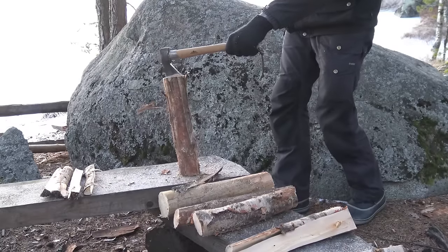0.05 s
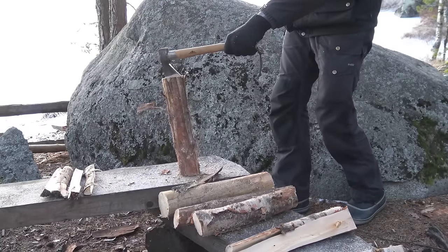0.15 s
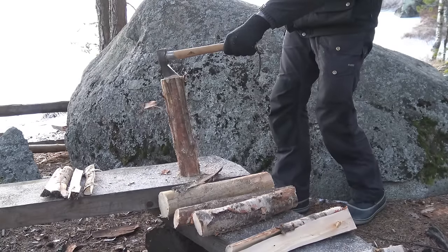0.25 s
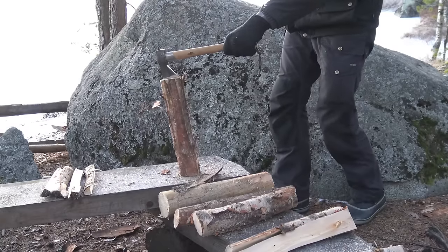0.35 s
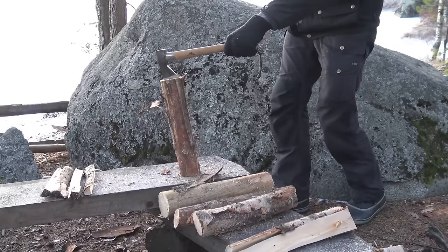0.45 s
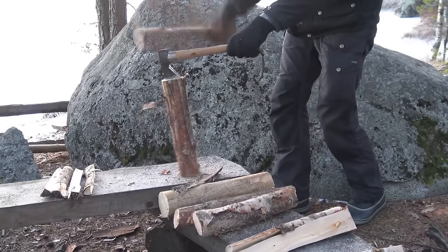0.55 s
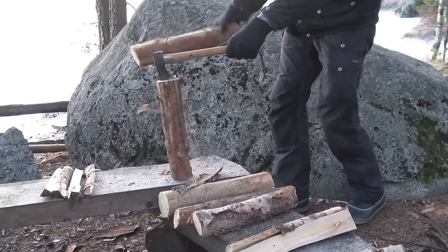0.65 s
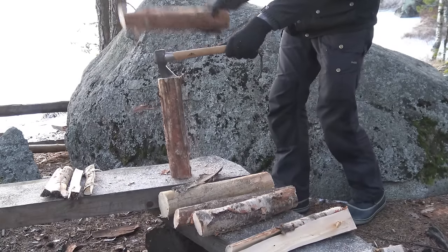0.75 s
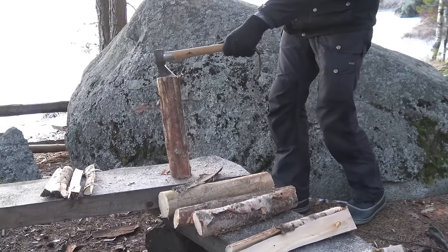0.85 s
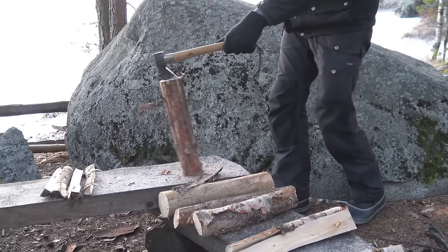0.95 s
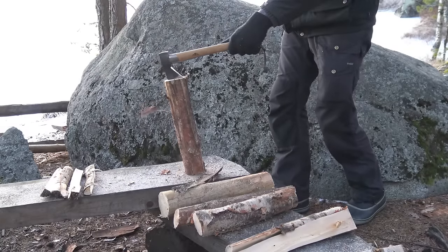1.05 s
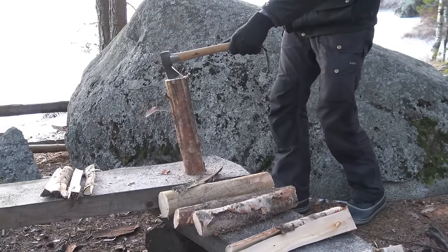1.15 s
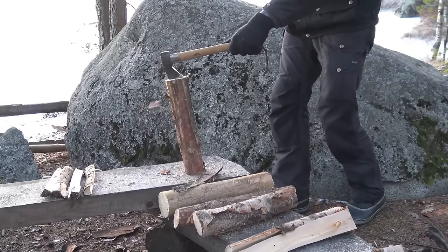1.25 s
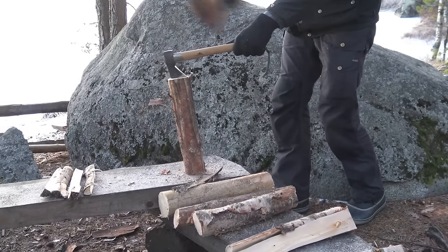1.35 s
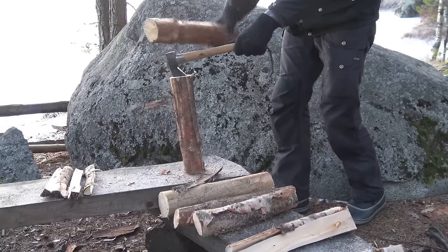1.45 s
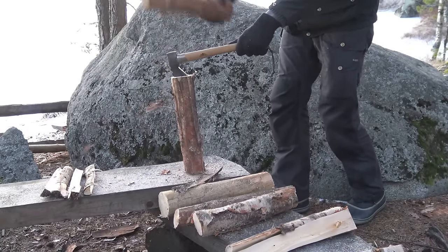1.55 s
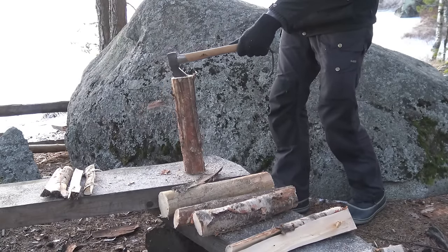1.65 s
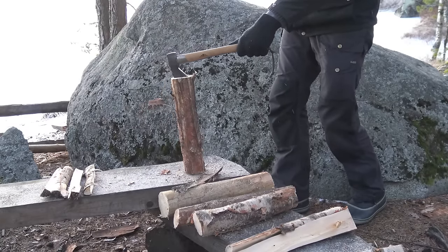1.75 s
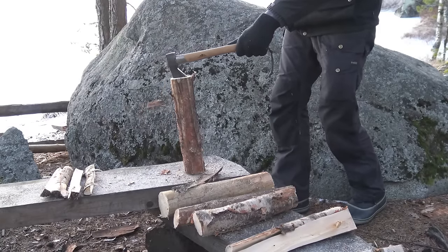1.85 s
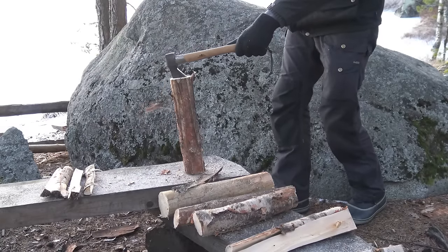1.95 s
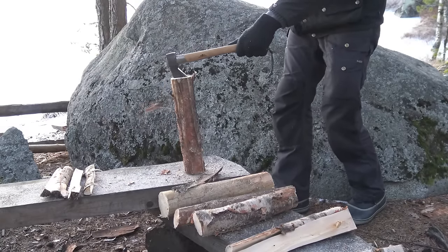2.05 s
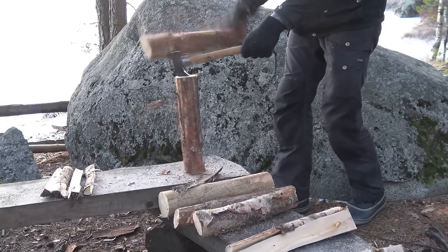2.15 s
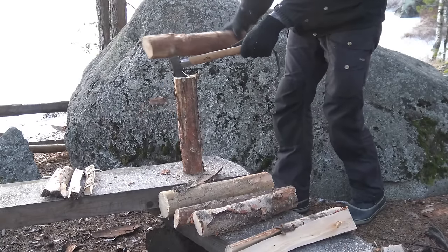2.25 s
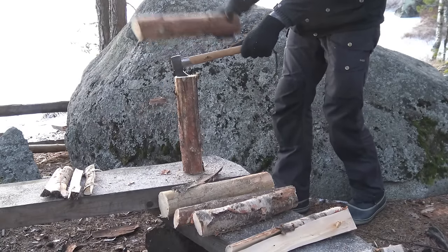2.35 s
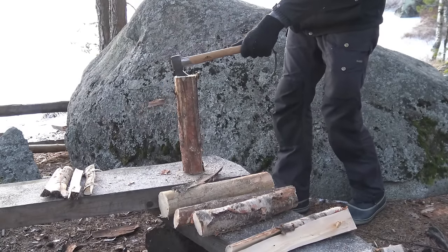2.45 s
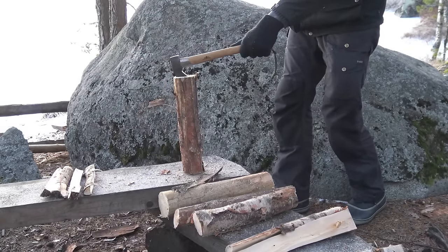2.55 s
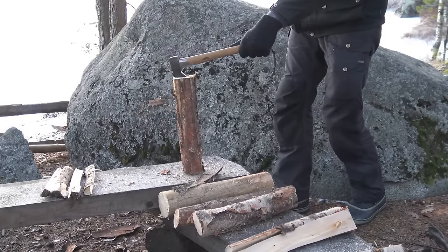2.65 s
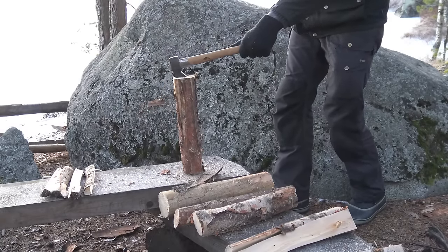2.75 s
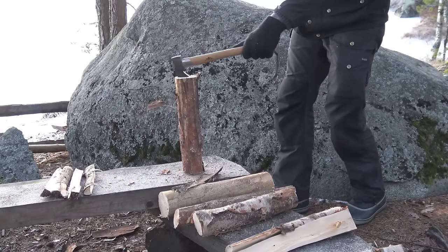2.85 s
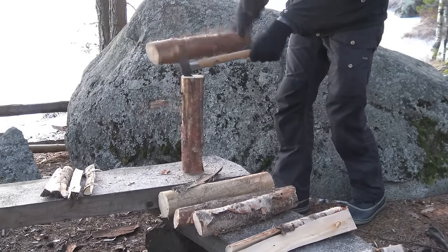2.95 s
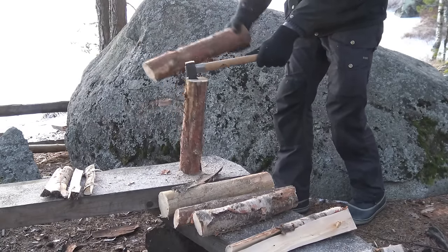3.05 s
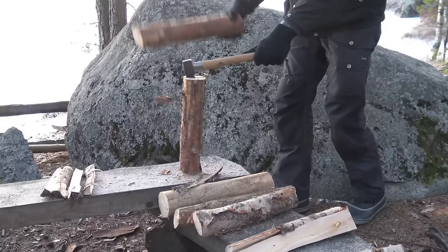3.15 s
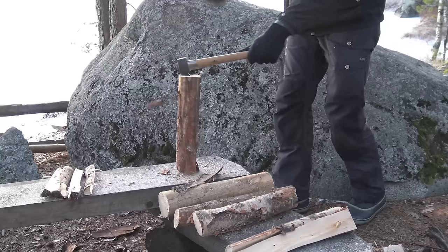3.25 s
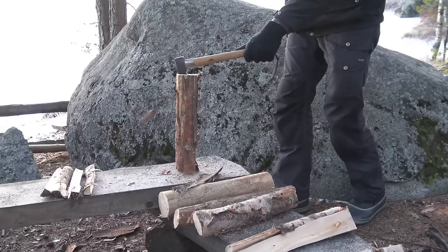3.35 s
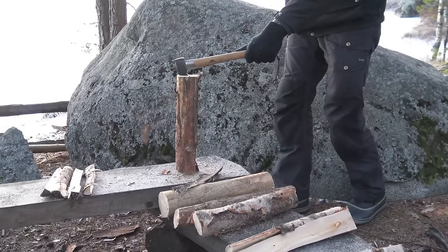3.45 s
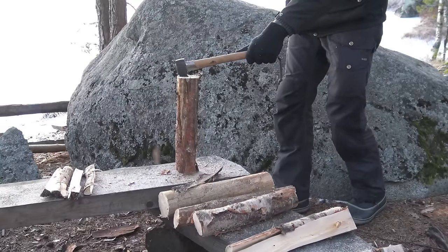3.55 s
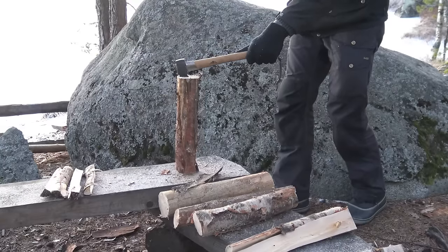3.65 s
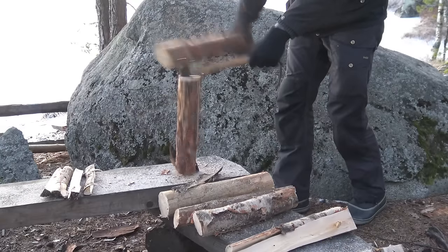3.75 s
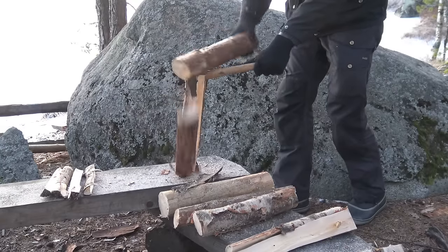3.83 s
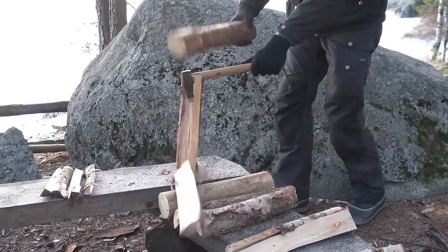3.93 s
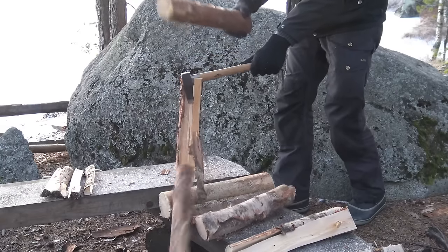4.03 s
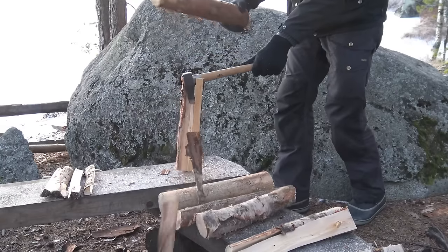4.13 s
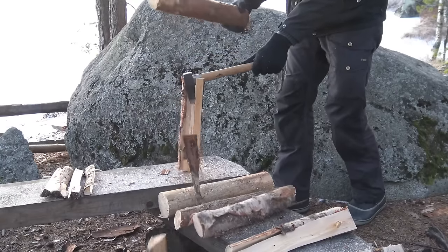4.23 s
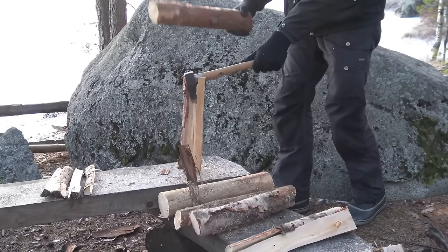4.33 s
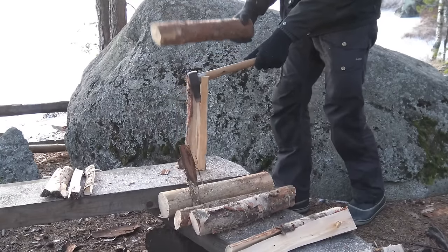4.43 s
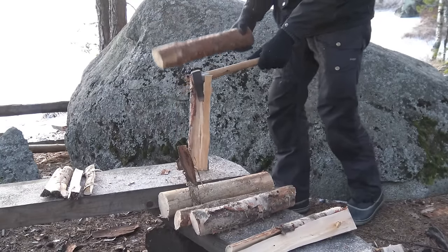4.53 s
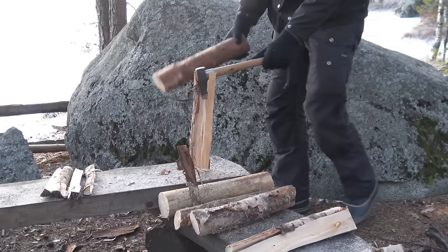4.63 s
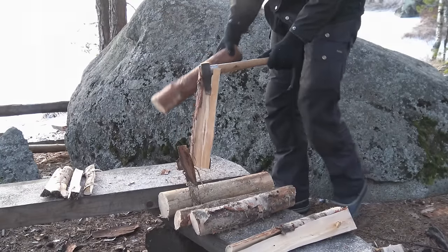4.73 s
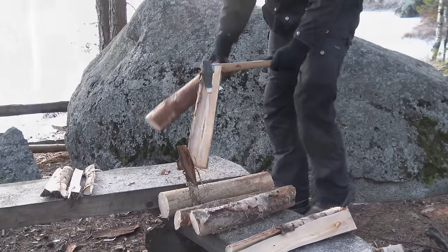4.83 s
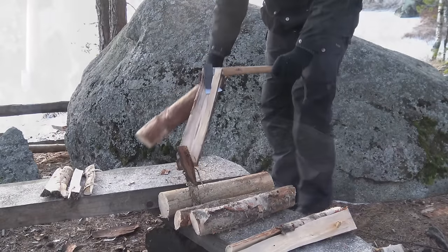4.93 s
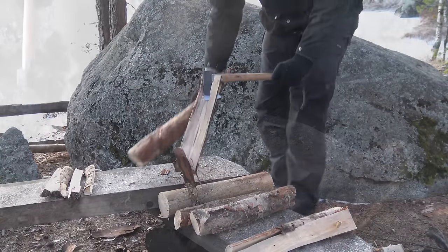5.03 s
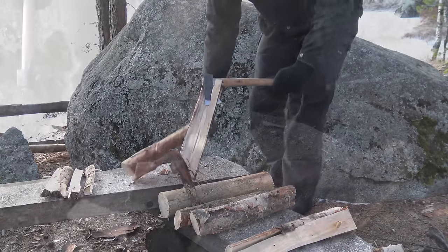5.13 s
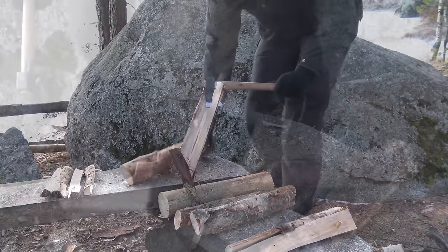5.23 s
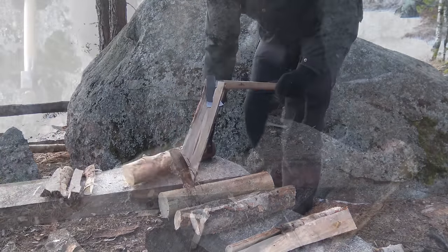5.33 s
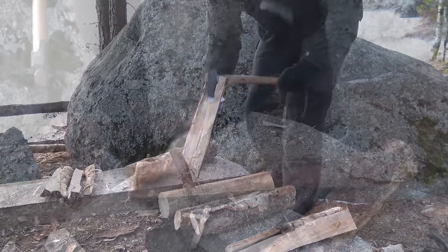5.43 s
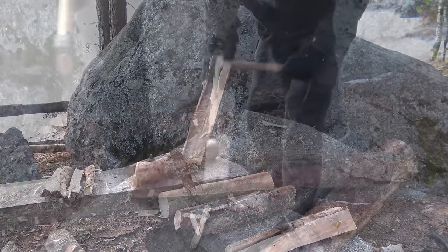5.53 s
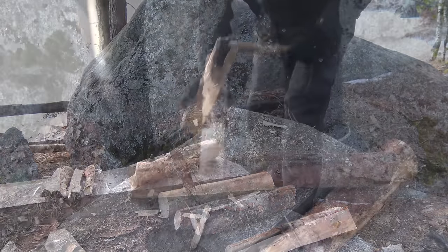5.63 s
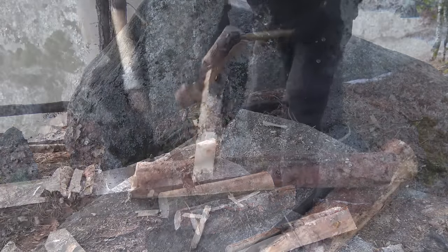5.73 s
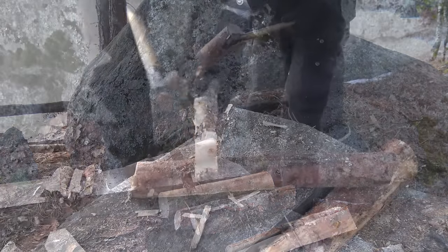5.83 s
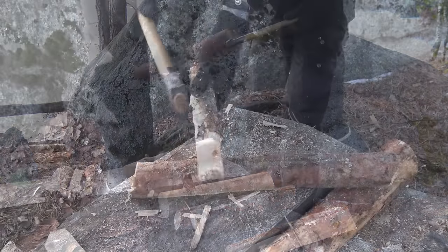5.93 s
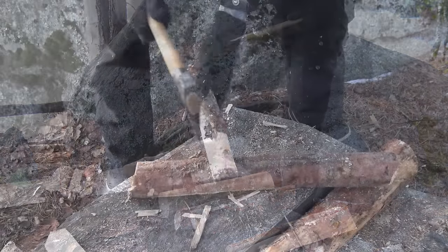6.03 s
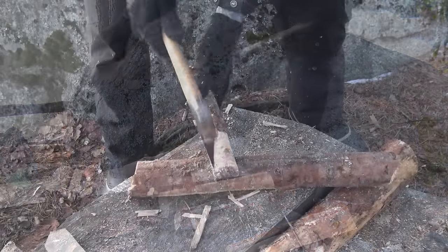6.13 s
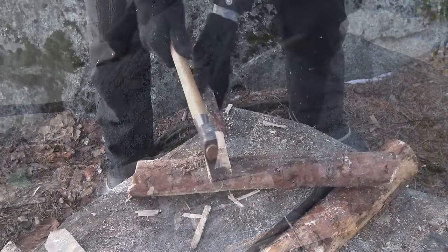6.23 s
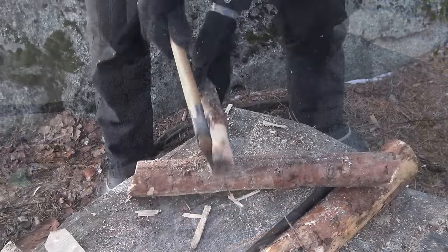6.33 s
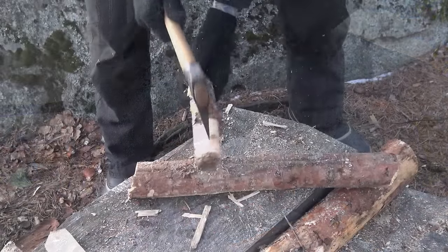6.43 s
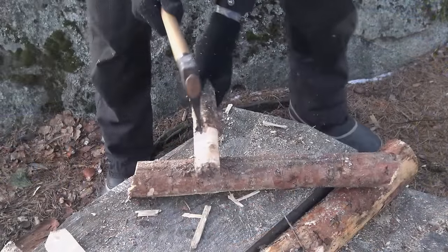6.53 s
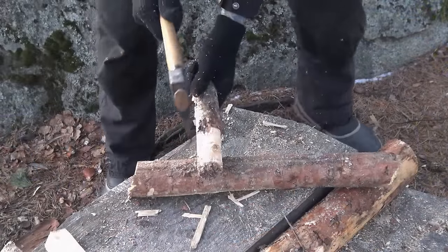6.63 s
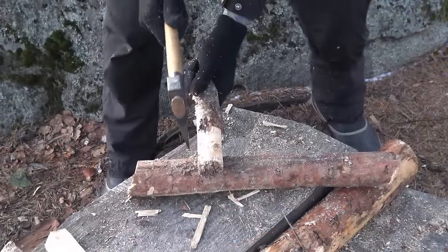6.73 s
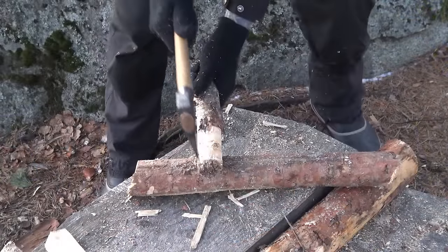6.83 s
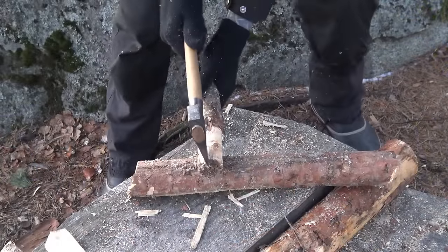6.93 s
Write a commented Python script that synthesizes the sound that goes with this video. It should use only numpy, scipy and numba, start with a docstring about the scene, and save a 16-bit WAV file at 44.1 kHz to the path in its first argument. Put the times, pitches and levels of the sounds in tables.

```python
"""On a plank bench in a quiet forest, a short log is swung as a club onto a hatchet set in a standing log, until
the log splits and the halves clatter down; then a stick is chopped with light blows and scraped by the blade.
Wood sounds as noise cracks and sums of decaying modes driven by a force pulse, steel as two decaying tones.
Clothes, boots, wind and forest are filtered noise, bark crackles in short noise bursts, and decaying noise
echoes the hits from a boulder and the trees; a limiter flattens the hardest blows."""
import sys
import numpy as np
from scipy import signal
from scipy.fft import rfft, irfft
from scipy.io import wavfile
from scipy.ndimage import uniform_filter1d
from numba import njit

SR = 44100
rng = np.random.default_rng(int(sys.argv[2]) if len(sys.argv) > 2 else 0)


def dump(signal):
    """Clip the signal to [-1, 1] and save it as 16-bit WAV at the path in sys.argv[1]."""
    limited = np.clip(np.atleast_2d(signal).T, -1, 1)
    pcm = np.round(limited * 32767).astype(np.int16)
    wavfile.write(sys.argv[1], SR, pcm)


N = 307818  # samples in the scene
MID_SIDE = np.array([[1], [-1]])  # opposite polarity left and right


def undb(db):
    """Level law: decibels become an amplitude ratio, or a power ratio when given 2 * db."""
    return 10 ** (np.asarray(db) / 20)


def unit(x):
    """Normalisation: scales a signal to an rms value of 1."""
    return x / np.sqrt(np.mean(x ** 2))


def fade(t, t60):
    """Exponential decay: the amplitude falls 60 dB in t60 seconds."""
    return np.exp(-np.log(1000) * t / max(t60, 1e-3))


def coloured(x, shape):
    """Spectral shaping: filters x through (f/Hz, level/dB) points on a log frequency axis, to rms 1."""
    hz, db = np.transpose(shape)
    size = x.shape[-1]
    f = np.maximum(np.arange(size // 2 + 1) * SR / size, 1)
    gain = undb(np.interp(np.log(f), np.log(hz), db))
    return unit(irfft(rfft(x) * gain, size))


def walk(rate):
    """Random modulation: levels held for 1 / rate seconds, smoothed by two moving averages, to rms 1."""
    hold = int(SR / rate)
    steps = np.repeat(rng.standard_normal(N // hold + 1), hold)
    return unit(uniform_filter1d(uniform_filter1d(steps, hold), hold)[:N])


def swell(s, rise_db_s, fall_db_s):
    """Exponential growth and decay: power climbs to 1 at s seconds and sinks, at steady dB per second."""
    t = np.arange(N) / SR - s
    return undb(2 * np.where(t < 0, rise_db_s * t, -fall_db_s * t))


def add(out, s, x, pan_db):
    """Superposition: mixes x in at s seconds, the left channel pan_db above the right."""
    start = int(s * SR)
    n = min(x.shape[-1], N - start)
    out[:, start:start + n] += x[..., :n] * undb(np.array([[pan_db], [-pan_db]]) / 2)


def spread(shape, size, side_db):
    """Partial coherence: coloured noise shared by both channels, plus a weak part of opposite polarity."""
    mid, side = coloured(rng.standard_normal((2, size)), shape)
    return mid + undb(side_db) * side * MID_SIDE


def wide(shape, side_db, grain_db):
    """Granular noise: grains of 40 samples and uneven level flicker in a partly coherent stereo field."""
    sizes = np.minimum(rng.exponential(size=N // 40 + 1), 5)
    grains = rng.standard_normal((2, N)) * undb(grain_db * np.repeat(sizes, 40)[:N])
    mid, side = coloured(grains[0], shape), coloured(grains[1], shape)
    return mid + undb(side_db) * side * MID_SIDE


# spectrum of the quiet forest: f/Hz, relative level per Hz/dB
FOREST_SPECTRUM = [(12, -38), (20, -16), (60, -6.5), (184, 0), (237, 0), (332, 0), (966, -3.5), (1350, -6),
                   (2240, -11), (8410, -12.5), (10800, -13.5), (15200, -23), (16500, -27)]


def forest():
    """Diffuse background noise: a steady spectrum whose level drifts slowly around -57 dB."""
    return wide(FOREST_SPECTRUM, -15, 0.59) * undb(-57 + 2.7 * walk(3.19))


# body movements between the blows, levels before flicker:
# peak t/s, rise/(dB/s), fall/(dB/s), cloth swish level/dB, boot scuff level/dB
BODY_MOVES = [(0.029, 194, 69, -59.5, -45.5), (0.22, 102, 100, -58.5, -59), (0.988, 254, 142, -43.5, -57.5),
              (1.8, 98, 132, -49.5, -55), (2.64, 82, 142, -52.5, -54), (3.3, 46, 95, -50, -52),
              (3.53, 148, 300, -45.5, -55.5), (4.2, 98, 99, -47, -66), (4.33, 92, 57, -40, -52),
              (4.7, 83, 148, -48.5, -54.5), (5.04, 105, 60, -46, -54), (5.22, 143, 60, -40.5, -65),
              (5.601, 66, 25, -51, -76), (5.72, 83, 48, -59, -48.5), (5.93, 58, 59, -43.5, -47.5),
              (6.16, 60, 71, -50.5, -48.5), (6.54, 113, 71, -50, -55), (6.71, 92, 71, -45, -45)]
# spectrum of cloth: f/Hz, relative level per Hz/dB
SWISH_SPECTRUM = [(880, -7.5), (1500, -0.5), (2010, -1.5), (4050, -3.5), (5000, -3.5), (9500, -3.5),
                  (15200, -14.5), (16000, -22), (16500, -39)]
# spectrum of boots and bark: f/Hz, relative level per Hz/dB
SCUFF_SPECTRUM = [(120, -7), (300, 5), (600, 2), (1000, -3.5), (1500, -5), (2500, -19), (4000, -60)]
# spectrum of wind and shaken ground: f/Hz, relative level per Hz/dB
WIND_SPECTRUM = [(15, -7), (30, 11), (60, 15), (110, 14), (200, -27)]
SWING_DB_S, SWING_SWISH_DB, SWING_SCUFF_DB = 120, -44, -44  # the downswing swells into each club blow
# debris settles and the ground rumbles on after each heavy hit; levels relative to the hit's peak
SETTLE_DB_S, SETTLE_SWISH_DB, SETTLE_SCUFF_DB = 37.5, -57, -45.5
RUMBLE_DB_S, RUMBLE_DB = 50, -54
WIND_DB = -67.5


def aftermath(fall_db_s):
    """Energy decay: the summed power that each blow and thud leaves behind."""
    return sum(swell(s, 2000, fall_db_s) * undb(2 * db) for s, db, *_ in CLUB_BLOWS + LANDINGS)


def rustle():
    """Friction noise: cloth in the treble, boots and bark below; wind and shaken ground in the bass."""
    moves = sum(swell(s, rise, fall) * undb(2 * np.array([[swish_db], [scuff_db]]))
                for s, rise, fall, swish_db, scuff_db in BODY_MOVES)
    swing = sum(swell(s, SWING_DB_S, 400) for s, *_ in CLUB_BLOWS)
    settle, rumble = aftermath(SETTLE_DB_S), aftermath(RUMBLE_DB_S)
    # independent sources add in power; the root gives the amplitude
    swish = np.sqrt(moves[0] + swing * undb(2 * SWING_SWISH_DB) + settle * undb(2 * SETTLE_SWISH_DB))
    scuff = np.sqrt(moves[1] + swing * undb(2 * SWING_SCUFF_DB) + settle * undb(2 * SETTLE_SCUFF_DB))
    low = np.sqrt(undb(2 * WIND_DB) + rumble * undb(2 * RUMBLE_DB))
    cloth = wide(SWISH_SPECTRUM, -37.5, 2.33) * swish * undb(2 * walk(30) + 1.5 * walk(120))
    boots = wide(SCUFF_SPECTRUM, -18.5, 2.45) * scuff * undb(2 * walk(30))
    return cloth + boots + wide(WIND_SPECTRUM, -18.5, 0.3) * low


# the louder snaps of bark and fibres: t/s, peak level/dB, centre f/Hz
SNAPS = [(0.165, -34.5, 8000), (0.2217, -36, 6810), (0.5137, -34.5, 8160), (1.2476, -35, 8370),
         (1.754, -33, 10600), (1.8339, -21.5, 3250), (2.656, -31, 9800), (3.2685, -26, 4500),
         (3.3015, -26, 8560), (3.3195, -12, 7560), (3.4486, -27, 3950), (3.529, -24, 10600),
         (3.6415, -28.5, 11000), (3.6678, -27, 5900), (3.7383, -30, 2000), (4.164, -27.5, 7570),
         (4.1906, -26.5, 2300), (4.4817, -31, 9900), (4.583, -7, 8400), (4.601, -10, 2130),
         (4.6445, -15, 2640), (4.743, -29, 6660), (4.907, -32, 3190), (5.0012, -28, 2280),
         (5.388, -31, 8400), (5.448, -29, 3430), (5.8362, -30.5, 3690), (5.918, -30, 5290),
         (5.9589, -19.5, 6640), (6.178, -33, 6820), (6.316, -31, 6300)]
FAINT_PER_S, FAINT_DB = 3, -42  # faint snaps fall at random, up to 8 dB above this level


def crackle():
    """Impulsive fracture: broadband bursts peak at a centre frequency and die within milliseconds."""
    out, t = np.zeros((2, N)), np.arange(SR // 50) / SR
    faint = [(when * N / SR, FAINT_DB + 8 * size, 2000 * 2 ** (2.4 * pitch))
             for when, size, pitch in rng.random((FAINT_PER_S * N // SR, 3))]
    lowpass = signal.butter(2, 13000, fs=SR)
    for s, db, hz in SNAPS + faint:
        shape = [(hz / 5, -20), (hz / 1.02, -5), (hz, 0), (hz * 1.03, -4), (hz * 4, -16)]
        decay = fade(t, 0.0061) + 0.33 * fade(t, 0.04)
        snap = signal.lfilter(*lowpass, coloured(rng.standard_normal(len(t)), shape) * decay)
        add(out, s, undb(db) * snap / np.abs(snap).max(), 2 * rng.standard_normal())
    return out


def echoes(x, near_db, near_s, far_db, far_s):
    """Reverberation by convolution: a brief boulder echo, then a longer tail scattered by the trunks."""
    t = np.arange(SR) / SR
    near = unit(rng.standard_normal(SR) * fade(t, near_s)) * MID_SIDE
    scattered = rng.standard_normal((2, SR)) * fade(t, far_s) * np.minimum(t / 0.018, 1)
    # strong in the deep bass and treble, weak around 1 kHz
    far = coloured(scattered, [(60, 22), (300, -5), (1000, -28), (4000, 4.0), (12000, 31)])
    response = undb(near_db) * near + undb(far_db) * far
    return signal.fftconvolve(x.mean(axis=0)[None], response, axes=1)[:, :N] / np.sqrt(SR)


# club on hatchet: t/s, body peak level/dB before panning and limiting, favoured f/Hz,
# focus/(dB/octave squared), ring time factor/1, crack level/dB and tearing level/dB relative to the peak,
# left minus right/dB, first touch before the crack/s, hum level/dB, low and high steel tone level/dB
CLUB_BLOWS = [(0.5854, 9.05, 556, 1.7, 1, -20.5, -26.5, 0.078, 0.012, -16, -41, -50),
              (1.4073, 8, 604, 1.12, 0.93, -19, -26, 0.46, 0.012, -14, -38.5, -44),
              (2.179, 5.2, 368, 2.2, 0.84, -28, -22, -0.54, 0.0094, -19, -41.5, -29),
              (2.9746, 3.45, 374, 2.3, 0.94, -9, -19, 0.5, 0.012, -23, -61, -59),
              (3.7774, 4.6, 383, 1.6, 0.96, -17, -15.5, 1.3, 0.0091, -21, -36, -47)]
CLUB_HZ = 560


def club():
    """Phase modulation: a short hum, its phase wobbling at random, leads up to each crack."""
    out, t = np.zeros((2, N)), np.arange(SR // 50) / SR
    for s, *_, lead_s, db, _, _ in CLUB_BLOWS:
        wobble = np.cumsum(uniform_filter1d(rng.standard_normal(len(t)), size=80)) * 0.17
        hum = np.sin(2 * np.pi * CLUB_HZ * t + wobble) * np.minimum(t / 0.0013, 1) * (t < lead_s)
        add(out, s - lead_s, undb(db) * hum, 0)
    return out


# spectrum of the contact crack: f/Hz, relative level per Hz/dB
CRACK_SPECTRUM = [(300, 4.5), (1000, 8.5), (2500, 1), (5000, -4), (9000, -7), (12000, -9.5), (16000, -28)]
# spectrum of tearing fibres: f/Hz, relative level per Hz/dB
TEAR_SPECTRUM = [(470, -12), (800, -5), (1450, -1.5), (1780, -7), (3020, -10), (3700, -8.5), (10600, -16),
                 (15300, -31), (16500, -45)]
SCATTER_DB = 2.5  # no two hits share out the modes alike
APART = .19  # how unlike the two channels hear one mode


def struck(events, modes, push_s, lag_s, cycles, detune, loose, chatter_s, chatter_db, tear_s):
    """Modal synthesis: a crack and tearing fibres, then modes driven by a push and a decaying chatter."""
    out, t = np.zeros((2, N)), np.arange(SR // 2) / SR
    hz, mode_db, t60 = np.transpose(modes)[:, :, None]
    for s, db, best_hz, focus_db, stretch, crack_db, tear_db, pan_db, *_ in events:
        chance = rng.standard_normal((4, len(modes), 1))
        # a body takes some cycles to swing up, so the lows come late; every mode starts with its own sign
        decay = np.exp(-np.log(1000) * t / (t60 * stretch))
        swing = decay * (1 - np.exp(-t * hz / cycles)) * np.sign(chance[0])
        focus = focus_db * np.log2(hz / best_hz) ** 2
        share = undb(mode_db - focus + SCATTER_DB * chance[1])
        # loosely seated wood: as contacts shift, each pitch sags from the jolt and wanders
        wander = unit(uniform_filter1d(rng.standard_normal((len(modes), len(t))), size=500, axis=1))
        pitch = hz * (1 + detune * chance[2] + loose * (wander + 1.438 * fade(t, .15)))
        ring = share * swing * np.sin(2 * np.pi * np.cumsum(pitch, axis=1) / SR)
        # each mode radiates its own way, so the channels get different shares, least in the bass
        tilt = APART * np.minimum(hz / 300, 1) * chance[3]
        pair = np.array([(ring * (1 + side * tilt)).sum(axis=0) for side in (1, -1)])
        push = unit(np.sin(np.pi * np.clip(t / push_s, 0, 1)))
        chatter = undb(chatter_db) * rng.standard_normal(len(t)) * fade(t, chatter_s)
        body = signal.fftconvolve(pair, (push + chatter)[None], axes=1)[:, :len(t)]
        crack = spread(CRACK_SPECTRUM, len(t), -24) * fade(t, 0.014) * (1 - np.exp(-t / 0.00023))
        # tearing comes in uneven grains of 30 samples
        grit = undb(1.9 * np.repeat(rng.exponential(size=len(t) // 30 + 1) - 1, 30)[:len(t)])
        tear_decay = (fade(t, tear_s) + 0.072 * fade(t, 3 * tear_s)) * (1 - np.exp(-t / 0.001))
        tear = spread(TEAR_SPECTRUM, len(t), -23) * grit * tear_decay
        add(out, s, undb(db) * (undb(crack_db) * crack + undb(tear_db) * tear), pan_db)
        add(out, s + lag_s, undb(db) * body / np.abs(body).max(), pan_db)
    return out


# modes of the bench: f/Hz, level/dB, t60/s before the ring time factor
BENCH_MODES = [(116.3, -6.5, 0.41), (160, -15, 0.36), (206.9, -15.5, 0.38), (239.4, -1.5, 0.23),
               (266.8, -0.8, 0.2), (322.6, -5.5, 0.24), (370.3, -5, 0.21), (454.4, -10.5, 0.2),
               (477.7, 2, 0.077), (541, -8.5, 0.14), (573.3, -2, 0.19), (637.3, -3, 0.076),
               (699, -3, 0.066), (759, -7.5, 0.12), (820, -18, 0.054), (924, -5, 0.07), (1053, -17, 0.22),
               (1260, -33, 0.047), (1355, -6.5, 0.093), (1500, -28.5, 0.06), (1590, -44, 0.043),
               (1834, -16, 0.032), (2058, -20.5, 0.32), (2760, -57, 0.06)]


def blows():
    """Impact excitation: each club blow on the hatchet rings the bench."""
    return struck(CLUB_BLOWS, BENCH_MODES, push_s=0.00059, lag_s=0.000998, cycles=2.2, detune=.02,
                  loose=0.0898, chatter_s=0.19, chatter_db=21.94, tear_s=0.29)


# hatchet head singing on after a blow: f/Hz, t60/s
STEEL_TONES = [(1460, 0.86), (2650, 0.34)]


def steel():
    """Lightly damped resonance: two thin tones of the hatchet head, fluctuating in level as they decay."""
    out, t = np.zeros((2, N)), np.arange(SR) / SR
    for s, *_, low_db, high_db in CLUB_BLOWS:
        waver = 1 + 1.1 * unit(uniform_filter1d(rng.standard_normal(SR), size=500))
        tones = sum(undb(db) * fade(t, t60) * np.sin(2 * np.pi * hz * t)
                    for (hz, t60), db in zip(STEEL_TONES, (low_db, high_db)))
        add(out, s, waver * tones, 0)
    return out


# split halves knocking together: t/s, level/dB, favoured f/Hz, focus/(dB/octave squared),
# ring time factor/1, crack level/dB, tearing level/dB, left minus right/dB, as for the blows
HALF_KNOCKS = [(3.961, -20, 2400, 1.4, 0.46, 0, -5.5, .3), (4.072, -19.5, 1900, 6, 0.4, -14, -11, .3),
               (4.080, -24.5, 1700, 1.7, 1.3, 5, -8, .3), (4.2225, -2, 2900, 1.8, 1.18, -9.5, -19.5, .3),
               (4.2605, -10.5, 2040, 12, 1.2, -5, -19.5, 0.51), (4.5845, -23.5, 1250, 12, 0.4, 0, 2, 1.1),
               (4.612, -14.5, 950, 4.8, 0.37, -16, -10.5, 1.1),
               (4.6455, -20.5, 2700, 5.7, 0.93, -20, -3, 2.5),
               (4.6555, -14, 2740, 29, 1.15, -4.5, -34, 1.4), (4.864, -40.5, 2550, 14, 0.48, -3, -1.5, 1.7),
               (5.0565, -8.5, 1600, 9.8, 0.33, -21, -23.5, 2.2), (5.087, -41, 2150, 5, .8, -8, -11, 1.2)]
# modes of the split halves: f/Hz, level/dB, t60/s before the ring time factor
HALF_MODES = [(850, -14.5, 0.25), (1156, 0, 0.02), (1410, -6, 0.035), (1580, -2, 0.023), (1730, -7, 0.011),
              (2082, 1.5, 0.053), (2630, 0.5, 0.018), (3000, -5, 0.012), (3090, -7, 0.045),
              (3570, -6, 0.016)]


def knocks():
    """Small-body resonance: the knocking halves ring high and are quickly damped."""
    return struck(HALF_KNOCKS, HALF_MODES, push_s=0.00031, lag_s=.0006, cycles=0.89, detune=0.018,
                  loose=0.024, chatter_s=0.019, chatter_db=28.7, tear_s=0.1)


# wood landing on bench or ground: t/s, level/dB, favoured f/Hz, focus/(dB/octave squared),
# ring time factor/1, crack level/dB, tearing level/dB, left minus right/dB, as for the blows
LANDINGS = [(3.978, 6, 626, 3, 1.2, -17, -31.5, -0.39), (5.130, -5.5, 298, 4, 1, -14, -33, 0.67),
            (5.2948, -9.5, 403, 6.8, 1.1, -6.5, -39, 0.32), (6.208, -8.5, 216, 0.97, 1.05, -24, -51, 0.36),
            (6.9234, -2.5, 203, 3.2, 0.84, -13.5, -42, -0.45)]
# modes under the landing wood: f/Hz, level/dB, t60/s before the ring time factor
GROUND_MODES = [(121.7, -12.5, 0.39), (147.2, -7, 0.3), (187.6, -9, 0.21), (235.8, 5.4, 0.14),
                (276, -12, 0.26), (320, 1, 0.11), (392, -15, 0.2), (428, -5.5, 0.16), (500, -17, 0.074),
                (539.7, -0.5, 0.056), (613, -10.5, 0.083), (707, -17.5, 0.14), (793, -18.5, 0.14),
                (860, -18, 0.053), (936, -2, 0.03), (1320, -25, 0.042)]


def thuds():
    """Low-frequency impact response: landing wood rings the low modes of what it falls on."""
    return struck(LANDINGS, GROUND_MODES, push_s=0.00072, lag_s=0.00194, cycles=0.34, detune=0.023,
                  loose=0.056, chatter_s=0.11, chatter_db=25.8, tear_s=0.21)


# blade tapping and scraping the stick: t/s, level/dB, favoured f/Hz, focus/(dB/octave squared),
# ring time factor/1, crack level/dB, tearing level/dB, left minus right/dB, as for the blows
BLADE_TAPS = [(5.7495, -5.5, 1560, 14, 0.99, -18.5, -56, 0.43),
              (6.014, -27, 900, 1.2, 0.97, -12, -9.5, 0.38), (6.022, -26, 1250, 4, 0.2, 4.5, -21, 0.3),
              (6.2085, -5, 1300, 0.98, 1, -12.5, -44, 0.76), (6.477, -38, 1000, 1.5, 0.37, -14, -6.5, .3),
              (6.514, -18.5, 870, 11, 0.19, -20, -36, 0.022),
              (6.541, -10.5, 1100, 1.8, 0.7, -23.5, -51, -0.34),
              (6.618, -26.5, 1200, 1.6, 0.88, -15, -22, 0.42),
              (6.694, -15.5, 1200, 1.1, 0.18, -16, -29, -.6),
              (6.712, -25, 1300, 1.2, 0.35, -22, -13, -0.19), (6.753, -37, 1300, 1.5, 0.32, 8, -13, -.6)]
# modes of the stick: f/Hz, level/dB, t60/s before the ring time factor
STICK_MODES = [(239, 0, 0.08), (670, -0.5, 0.026), (920, -29, .04), (1005, -7.5, 0.1), (1117, -3.5, 0.14),
               (1260, -13, 0.065), (1437, -4, 0.043), (1497, -2.5, 0.019), (1810, -3.5, 0.014),
               (2250, -11, 0.038)]


def taps():
    """Bar resonance: light blows of the blade ring the stick."""
    return struck(BLADE_TAPS, STICK_MODES, push_s=0.00036, lag_s=0.00024, cycles=0.22, detune=0.006,
                  loose=0.0056, chatter_s=0.039, chatter_db=27.7, tear_s=0.15)


# blade dragged along the stick: t/s, level/dB
DRAG = [(6.46, -58), (6.48, -43), (6.56, -40.5), (6.62, -43.5), (6.70, -37.5), (6.78, -52), (6.86, -53.5),
        (6.9, -55)]


def scrape():
    """Stick-slip friction: dense clicks of uneven size ring the stick's modes, damped by the hand."""
    t = np.arange(SR // 10) / SR
    clicks = (rng.random(N) < 1500 / SR) * rng.standard_normal(N)  # about 1500 per second
    slips = clicks * undb(2.5 * np.minimum(rng.exponential(size=N), 3))
    # the hand leaves 0.35 of each ring time; mode level differences are halved in dB
    ring = sum(undb(db / 2) * fade(t, 0.35 * t60) * np.sin(2 * np.pi * hz * t) for hz, db, t60 in STICK_MODES)
    sound = unit(signal.fftconvolve(slips, ring)[:N]) + 0.095 * coloured(slips, TEAR_SPECTRUM)
    s, db = np.transpose(DRAG)
    return sound * undb(np.interp(np.arange(N) / SR, s, db, left=-120, right=-120))


def scene():
    """Superposition: direct hits, their echoes, rustle and forest add up."""
    hits = crackle() + club() + blows() + steel() + knocks() + thuds() + taps() + scrape()
    return forest() + rustle() + hits + echoes(hits, near_db=-48.0, near_s=0.01, far_db=-16.5, far_s=0.23)


@njit
def limiter(x, top, attack, release):
    """Gain control: both channels share a gain that holds the smoothed peak envelope under top."""
    y, envelope = np.empty_like(x), 0.
    for i in range(x.shape[1]):
        peak = max(abs(x[0, i]), abs(x[1, i]))
        envelope += (peak - envelope) * (attack if peak > envelope else release)
        y[:, i] = x[:, i] * min(1., top / (envelope + 1e-9))
    return y


LIMIT_DB, ATTACK_S, RELEASE_S = -4, .0004, .008  # envelope ceiling before saturation, time constants
TOP_HZ = 16200


def record(dry):
    """Nonlinear compression: limits the peaks, rounds what slips through and cuts the top of the band."""
    held = limiter(dry, undb(LIMIT_DB), 1 / (ATTACK_S * SR), 1 / (RELEASE_S * SR))
    rounded = np.tanh(1.08 * held) / 1.187
    return signal.sosfilt(signal.ellip(8, .2, 70, TOP_HZ, fs=SR, output="sos"), rounded)


dry = scene()
out = record(dry)
dump(out)
```